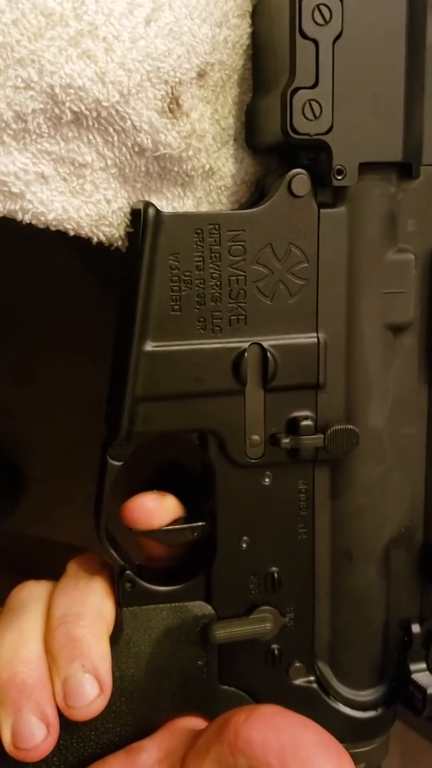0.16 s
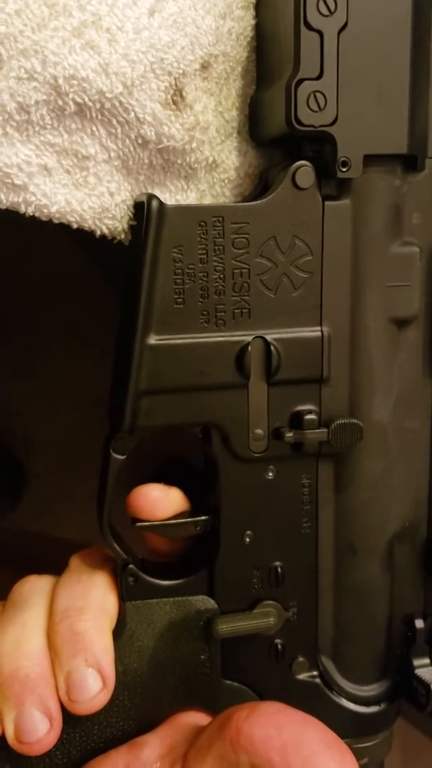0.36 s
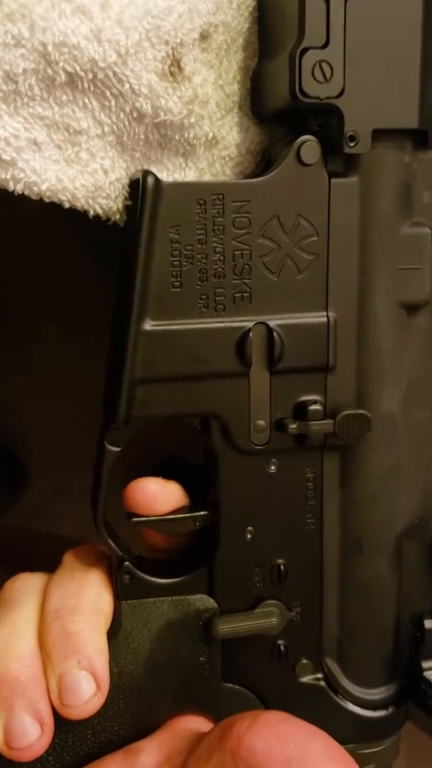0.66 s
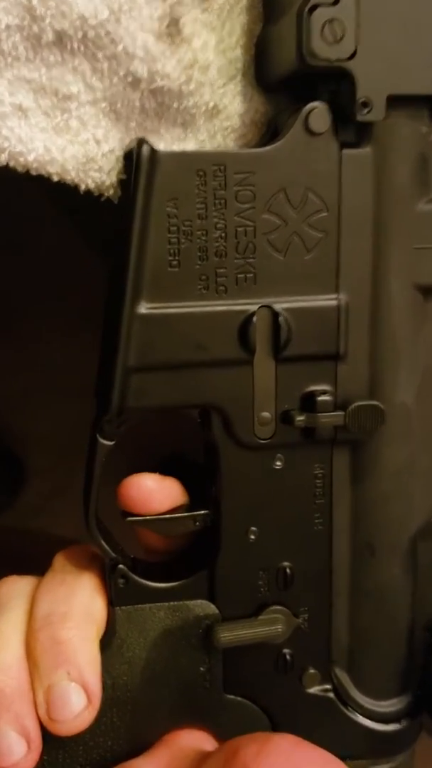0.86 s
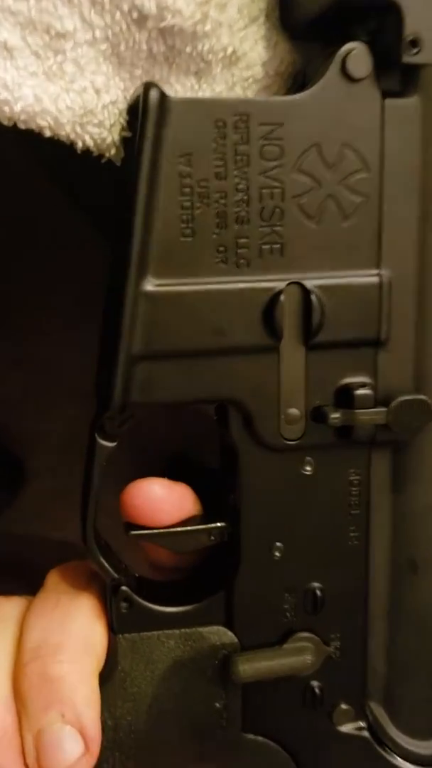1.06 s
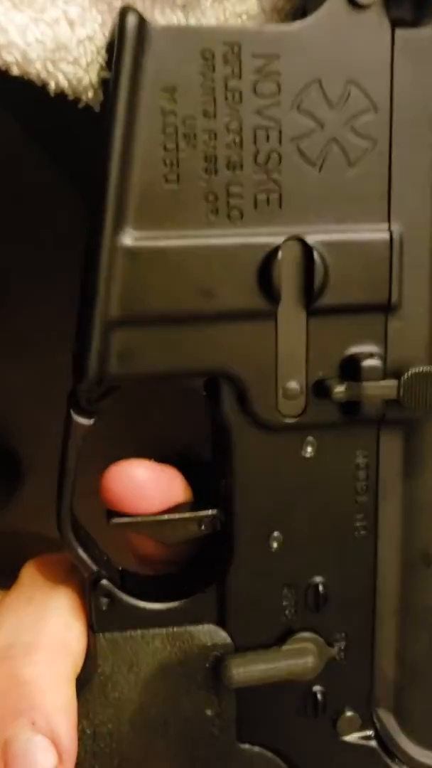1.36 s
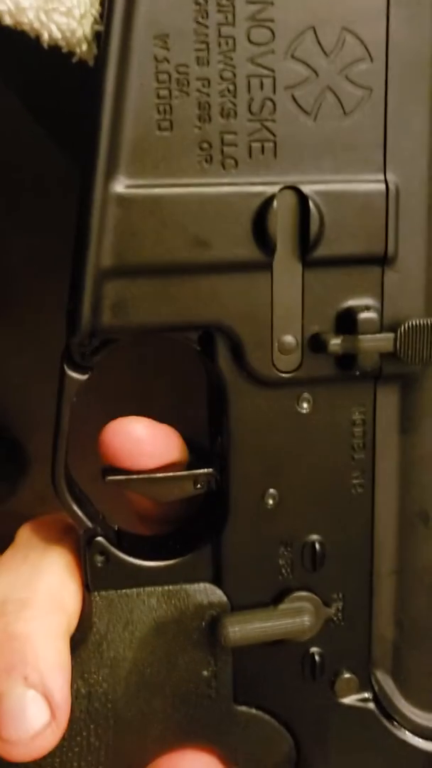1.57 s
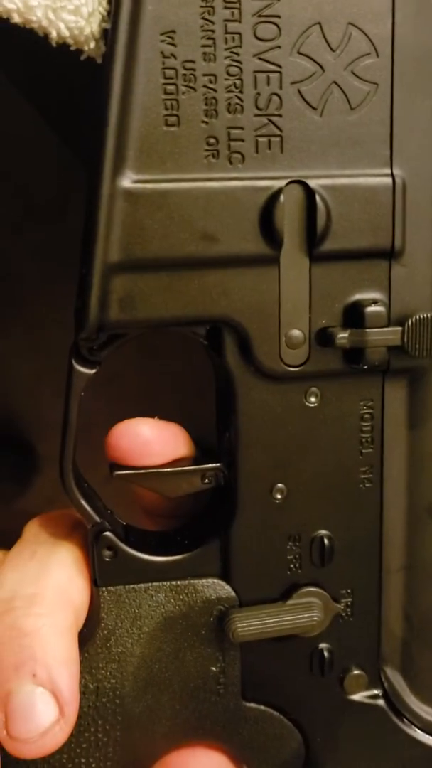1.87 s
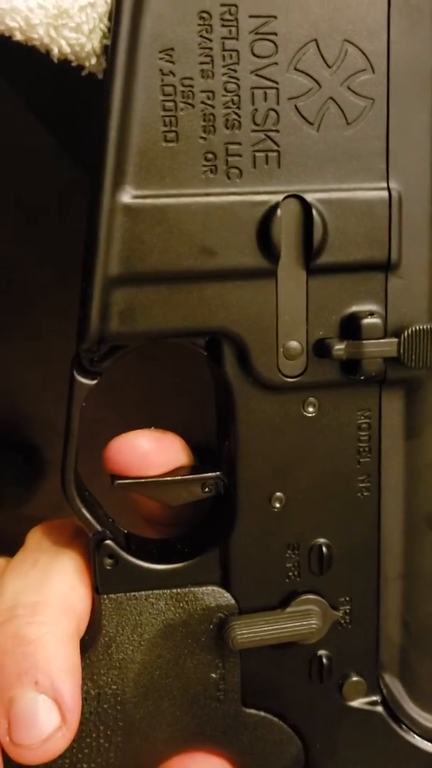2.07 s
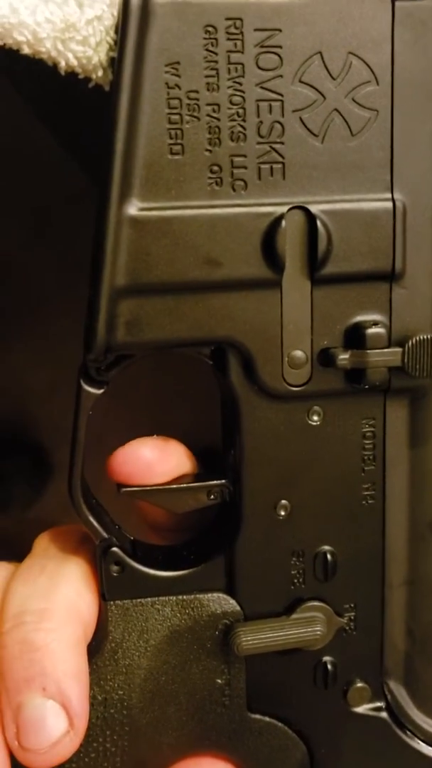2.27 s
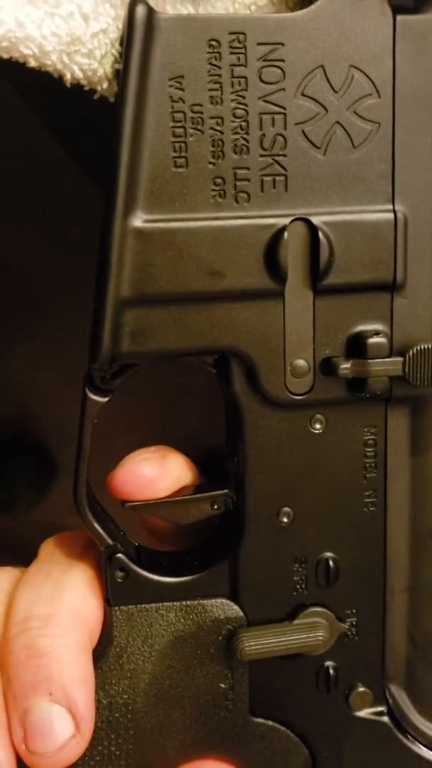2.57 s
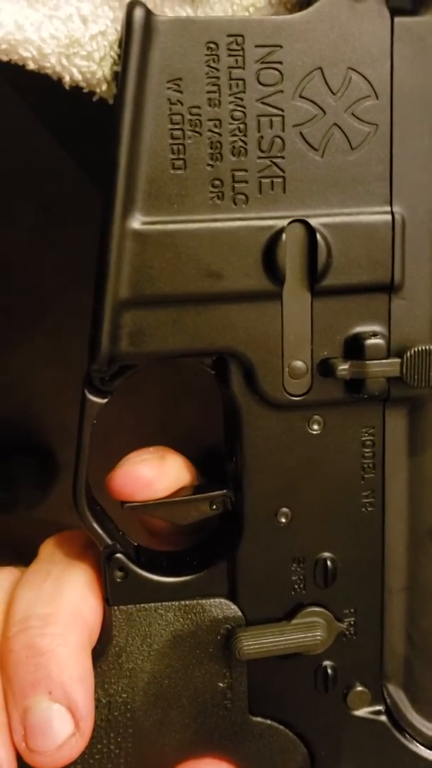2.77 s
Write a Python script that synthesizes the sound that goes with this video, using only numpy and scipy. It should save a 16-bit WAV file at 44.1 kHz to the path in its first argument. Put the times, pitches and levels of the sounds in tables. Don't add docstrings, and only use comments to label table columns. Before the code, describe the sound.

A crisp steel click of a gun trigger, then faint hand rustle and a tiny tap

```python
import sys
import numpy as np
from scipy import signal
from scipy.fft import rfft, irfft
from scipy.io import wavfile
from scipy.ndimage import uniform_filter1d

SR = 44100
rng = np.random.default_rng(int(sys.argv[2]) if len(sys.argv) > 2 else 0)


def attenuation_scalar(level_db):
    decades = np.asarray(level_db, float) / 20
    return 10 ** decades


def to_wav(s):
    ch = np.atleast_2d(s).T
    pcm = np.round(np.clip(ch, -1, 1) * 32767)
    wavfile.write(sys.argv[1], SR, pcm.astype(np.int16))


N = 128772
T = np.arange(N) / SR

STEEL_HZ = [1346, 1737, 2730, 2852, 2997, 3279, 3529, 3614, 3978, 4484, 4750, 5150, 5873, 7111]
# ring level/dB, t60/s, clack level/dB, left minus right level/dB
STEEL_MODES = [(-21, 0.07, -35, 20), (-14.5, 0.09, -31, 9), (-8, 0.1, -18, 6), (-3, 0.14, 3, 5),
               (-14, 0.14, -29, -3), (-12, 0.13, -18, 3), (-6, 0.14, 3.5, 4), (-9, 0.13, -15, 8),
               (-18, 0.12, -19, 2), (-10, 0.13, 0, -3), (-15, 0.1, -12, -3), (-22, .08, -10, -12),
               (-19, 0.05, -17.5, -18), (-26, 0.05, -22, -4)]
# t/s, left level/dB, right level/dB
CONTACTS = [
    (.1742, -16, -2),
    (.1748, -3, -22),
]
# f/Hz, spectral level/dB per Hz
CRACK = [(1000, -43), (2500, 6), (4500, 3.5), (6000, -1), (8000, -7), (11000, -8), (15500, -7)]
# f/Hz, level/dB, t60/s
REBOUND = [
    (310, -22.5, .007),
    (800, -36, .012),
]
# f/Hz, left level/dB, t60/s, right minus left level/dB
TICK = [
    (2300, -47, .004, -30),
    (3450, -42.5, .005, -31),
    (5550, -49, .005, -33),
]
# f/Hz, spectral level/dB per Hz
FIZZ = [(7500, -30), (9500, -3), (12000, -11), (15500, 7)]
# f/Hz, spectral level/dB per Hz
PEEL = [(300, 0), (800, 2), (1400, -13), (2200, -9), (3400, -11), (4200, -29), (9000, -42), (15000, -14)]
# t/s, rustle level/dB, case rumble level/dB
HAND = [(0, -104, -84), (.3, -77.5, -65), (.55, -89, -62), (.85, -77, -56), (1.1, -82, -64.5),
        (1.124, -76, -55), (1.15, -79, -52), (1.2, -79, -63.5), (1.351, -77.5, -63.5), (1.548, -76, -53),
        (1.7, -78, -59), (1.95, -82, -61), (2.3, -85, -71.5), (2.92, -96, -58.5)]
# f/Hz, spectral level/dB per Hz
RUSTLE = [(300, -1.5), (550, -4), (1000, -5), (1400, -14), (2000, -6), (3500, -19.5), (7000, -34),
          (15000, -19.5)]
# f/Hz, spectral level/dB per Hz
CASE = [(20, -12), (60, 5), (130, -2), (250, -11), (450, -14), (900, -52.5)]
# multiple of shaft rate, level/dB
HARMONICS = [(1, -5), (2, -15.5), (3, -6.5), (4, -7.5), (5, -16), (6, 0.5), (7, -4), (8, -2), (9, -15),
             (10, -9.5), (11, 2), (12, 1), (13, -16.5), (14, -14), (15, -25.5), (16, -9), (17, -16.5),
             (18, -42), (19, -31.5), (20, -30)]
# f/Hz, level/dB
MAINS = [
    (119.5, -71),
    (373, -77),
]
# f/Hz, spectral level/dB per Hz
RUMBLE = [(18, 7), (35, 1.5), (100, -7.5), (230, 4.5), (330, -3.5), (420, -14.5), (600, -27.5), (1200, -50)]
# f/Hz, spectral level/dB per Hz
HISS_L = [(300, 0), (1080, -6.5), (1300, -13.5), (1900, -11), (4000, -19.5), (6000, -25.5), (8200, -30),
          (12000, -17)]
# f/Hz, spectral level/dB per Hz
HISS_R = [(400, 0), (1050, -6), (1450, -10.5), (2100, -13), (4000, -14.5), (6000, -21), (8200, -24.5),
          (12000, -8.5)]
# t/s, share of cells dropped
DROPOUTS = [(0, .08), (.18, .1), (.21, .65), (.29, .5), (.33, .12), (.5, .3), (.65, .1), (.95, .2),
            (1.1, .05), (1.15, .65), (1.28, .5), (1.33, .15), (1.7, .3), (2.0, .08), (2.3, .15),
            (2.55, .15), (2.64, .6), (2.75, .12)]


def unit(x):
    return x / np.sqrt(np.mean(x ** 2))


def noise(colour):
    hz, db = np.array(colour, float).T
    f = np.maximum(np.arange(N // 2 + 1) * SR / N, 1)
    gain = attenuation_scalar(np.interp(np.log(f), np.log(hz), db))
    return unit(irfft(rfft(rng.standard_normal(N)) * gain, N))


def walk(rate):
    k = int(SR / rate)
    held = np.repeat(rng.standard_normal(N // k + 1), k)
    return unit(uniform_filter1d(uniform_filter1d(held, k), k)[:N])


def since(start):
    return np.maximum(T - start, 0)


def fade(start, t60):
    return (T >= start) * np.exp(-np.log(1000) * since(start) / t60)


def ring(start, hz, t60, rise=1e-5, wander=0):
    onset = 1 - np.exp(-since(start) / rise)
    return fade(start, t60) * onset * np.sin(2 * np.pi * hz * (T - start) + wander)


def ports(left_db, right_db):
    return attenuation_scalar(np.array([[left_db], [right_db]]))


def rattle():
    depth_rad, rate_hz, apart = 0.7, 110, 0.6
    common = walk(rate_hz)
    return depth_rad * (common + apart * np.array([walk(rate_hz), walk(rate_hz)]))


def steel_modes(start):
    ring_db, clack_db, clack_cycles, contact_s = -54.5, -42, 57, 0.00015
    out = np.zeros((2, N))
    for k, (hz, (mode_db, t60, mode_clack_db, pan_db)) in enumerate(zip(STEEL_HZ, STEEL_MODES)):
        sign = (-1) ** k
        tone = sign * attenuation_scalar(ring_db + mode_db) * ring(start, hz, t60, contact_s, rattle())
        for s, left_db, right_db in CONTACTS:
            clack = attenuation_scalar(clack_db + mode_clack_db) * ring(s, hz, clack_cycles / hz, contact_s)
            tone = tone + ports(left_db, right_db) * clack
        out += ports(pan_db / 2, -pan_db / 2) * tone
    return out


def add_echoes(dry_snap):
    room_db, delay_s, t60_s, top_hz = -9, 0.0052, 0.17, 4400
    echoes = rng.standard_normal((2, N)) * fade(delay_s, t60_s)
    echoes = echoes / np.sqrt(np.sum(echoes ** 2, axis=1, keepdims=True))
    echoes = signal.lfilter(*signal.butter(2, top_hz, fs=SR), echoes)
    return dry_snap + attenuation_scalar(room_db) * signal.fftconvolve(dry_snap, echoes, axes=1)[:, :N]


def snap():
    crack_db, crack_t60_s, crack_lead_s, low_hz = -54, 0.042, 0.0004, 1120
    start = CONTACTS[0][0]
    out = steel_modes(start)
    crack = np.array([noise(CRACK), noise(CRACK)])
    out += attenuation_scalar(crack_db) * fade(start - crack_lead_s, crack_t60_s) * crack
    return signal.lfilter(*signal.butter(2, low_hz, "high", fs=SR), add_echoes(out))


def air_push(start):
    squeeze_db, squeeze_s, right_db = -27.5, 0.0009, -32
    squeeze = (T < start) * np.exp(np.minimum(T - start, 0) / squeeze_s)
    push = attenuation_scalar(squeeze_db) * squeeze
    for hz, db, t60 in REBOUND:
        push = push - attenuation_scalar(db) * ring(start, hz, t60)
    push = signal.lfilter(*signal.butter(2, 2000, fs=SR), push)
    push = signal.lfilter(*signal.butter(1, 61.4, "high", fs=SR), push)
    push = signal.lfilter(*signal.iirnotch(1360, 1.44, SR), push)
    return push * ports(0, right_db)


def tick(start):
    fizz_db, fizz_right_db, fizz_t60_s, contact_s = -46, -10, 0.0045, 0.00015
    fizz = fade(start, fizz_t60_s) * noise(FIZZ)
    out = ports(fizz_db, fizz_db + fizz_right_db) * fizz
    for hz, db, t60, right_db in TICK:
        out += ports(db, db + right_db) * ring(start, hz, t60, contact_s)
    return out


def peel(start):
    level_db, right_db, rise_s, t60_s, flicker_db = -57.5, -21, 0.0091, 0.26, 2.5
    swell = fade(start, t60_s) * (1 - np.exp(-since(start) / rise_s)) * attenuation_scalar(flicker_db * walk(90))
    return ports(level_db, level_db + right_db) * swell * np.array([noise(PEEL), noise(PEEL)])


def tap():
    tap_s, tick_lead_s = 1.11825, 0.0004
    return air_push(tap_s) + tick(tap_s - tick_lead_s) + peel(tap_s)


def hand():
    rustle_right_db, case_right_db, flicker_db = -4.5, -9, 2.5
    s, rustle_db, case_db = np.array(HAND).T
    rustle = ports(0, rustle_right_db) * np.array([noise(RUSTLE), noise(RUSTLE)])
    rustle = rustle * attenuation_scalar(np.interp(T, s, rustle_db) + flicker_db * walk(59.57))
    rumble = noise(CASE) * attenuation_scalar(np.interp(T, s, case_db))
    return rustle + rumble * ports(0, case_right_db)


def motor():
    shaft_hz, speed_drift, knock_s = 22.44, 0.00046, 0.011
    level_db, flutter_db = -66.5, 1.8
    sweep_rad, sweep_order, scatter_rad = 0.12, 11.5, 0.6
    turn = 2 * np.pi * shaft_hz * (np.cumsum(1 + speed_drift * walk(2)) / SR - knock_s)
    out = np.zeros(N)
    for k, db in HARMONICS:
        phase = scatter_rad * rng.standard_normal() - sweep_rad * (k - sweep_order) ** 2
        level = attenuation_scalar(level_db + db + flutter_db * walk(5.815))
        out += level * np.sqrt(2) * np.sin(k * turn + phase)
    for hz, db in MAINS:
        out += attenuation_scalar(db + flutter_db * walk(2.5)) * np.sqrt(2) * np.sin(2 * np.pi * hz * T)
    return out


def hum():
    rumble_db, stray_db, lag_s, pan_db = -62.5, -11, 0.00014, 5.5
    out = motor() + attenuation_scalar(rumble_db + 0.7 * walk(1.8)) * noise(RUMBLE)
    stray = attenuation_scalar(rumble_db + stray_db) * noise(RUMBLE)
    left = np.interp(T - lag_s, T, out)
    return np.array([left, out + stray]) * ports(pan_db / 2, -pan_db / 2)


def hiss():
    left_db, right_db, swell_db = -70.5, -74.5, 0.45
    return ports(left_db, right_db) * np.array([noise(HISS_L), noise(HISS_R)]) * attenuation_scalar(swell_db * walk(3.9))


def scene():
    return snap() + tap() + hand() + hum() + hiss()


def thin_out(x):
    thin_hz, width_hz, drop_db = 7600, 1700, -25
    hz, s, cells = signal.stft(x, SR, nperseg=2048)
    chance = rng.random((len(hz) // 9 + 1, len(s) // 2 + 1))
    chance = chance.repeat(9, axis=0).repeat(2, axis=1)[:len(hz), :len(s)]
    band = np.exp(-((hz[:, None] - thin_hz) / width_hz) ** 2)
    share = band * np.interp(s, *np.array(DROPOUTS).T)
    gated = cells * np.where(chance < share, attenuation_scalar(drop_db), 1)
    return signal.istft(gated, SR, nperseg=2048)[1][:, :N]


def low_pass(x):
    return signal.sosfilt(signal.butter(12, 16410, fs=SR, output="sos"), x)


def record(dry):
    top_cut = signal.ellip(8, 0.2, 40, 15750, fs=SR, output="sos")
    mix = signal.sosfilt(top_cut, thin_out(dry))
    return low_pass(mix)


dry = scene()
out = record(dry)
to_wav(out)
```